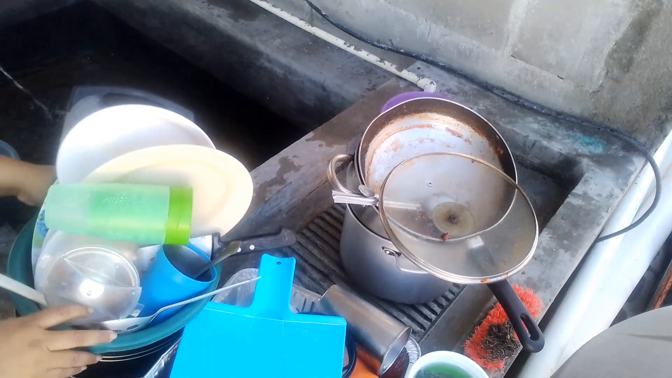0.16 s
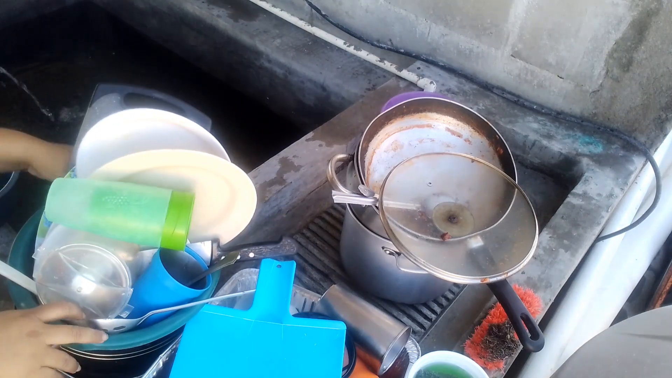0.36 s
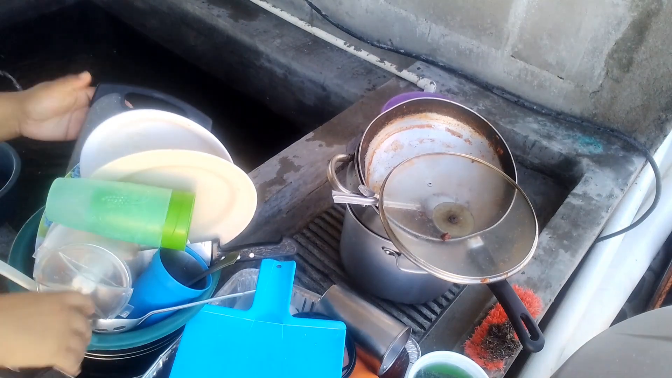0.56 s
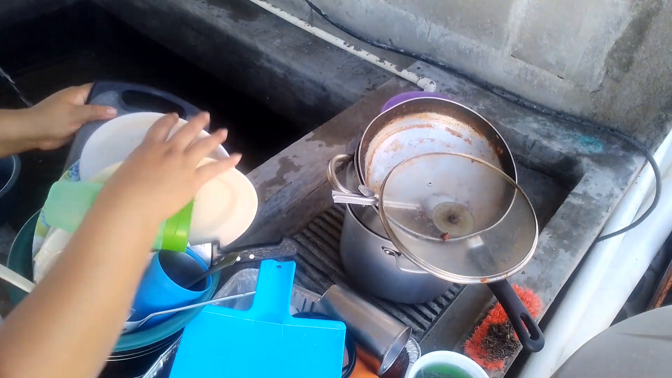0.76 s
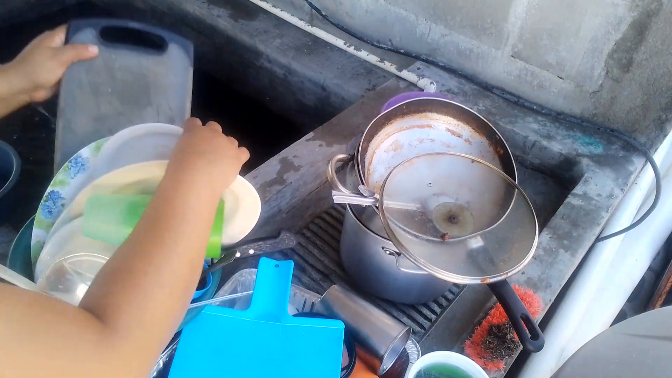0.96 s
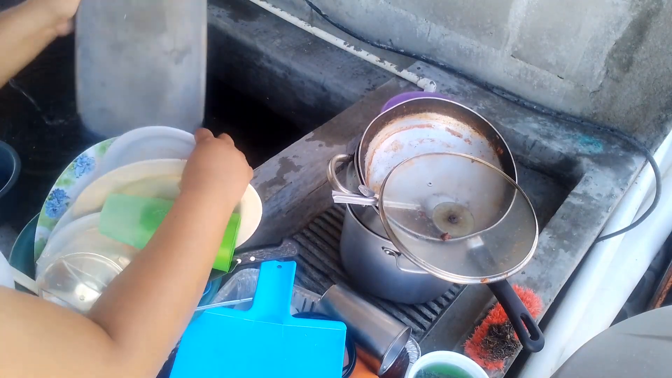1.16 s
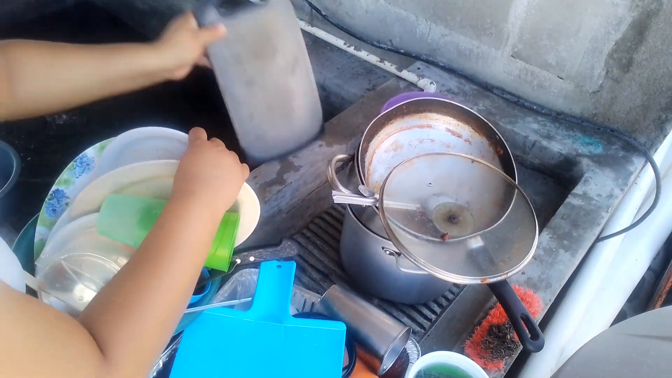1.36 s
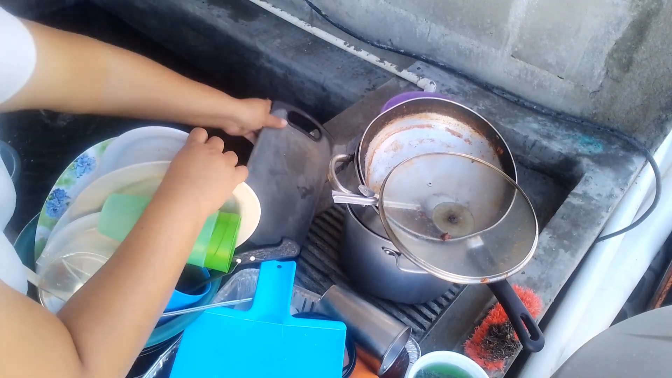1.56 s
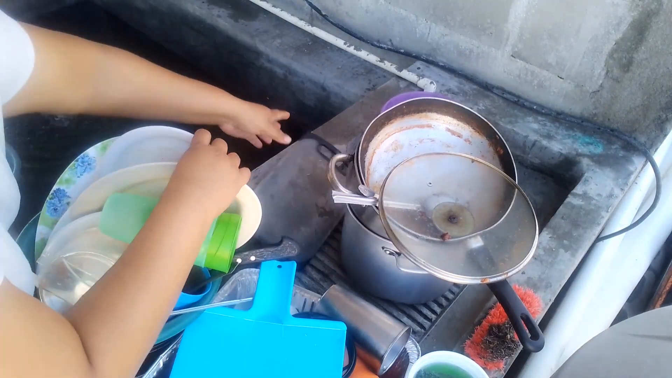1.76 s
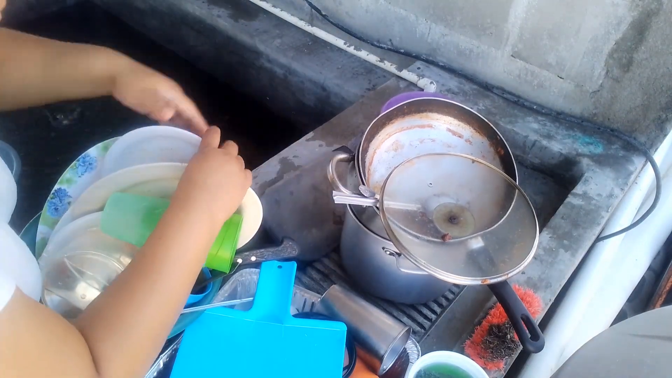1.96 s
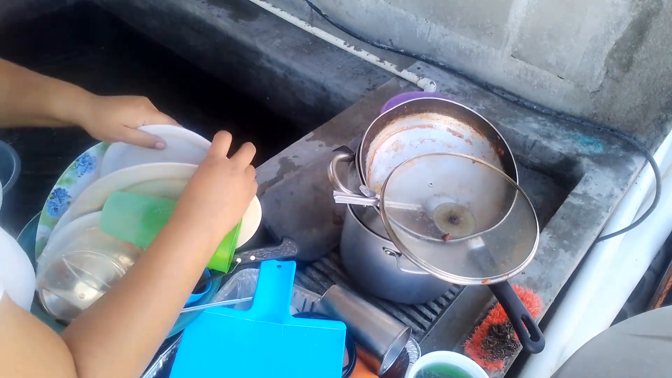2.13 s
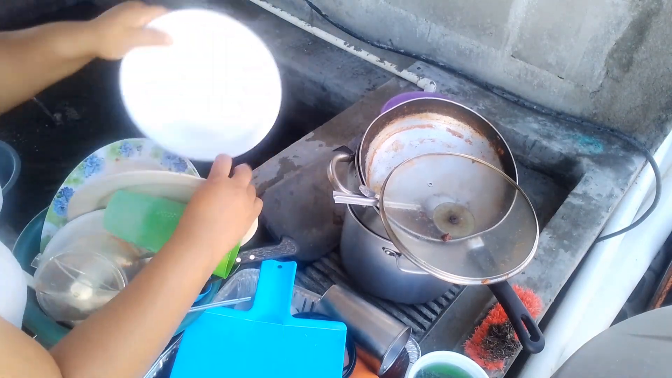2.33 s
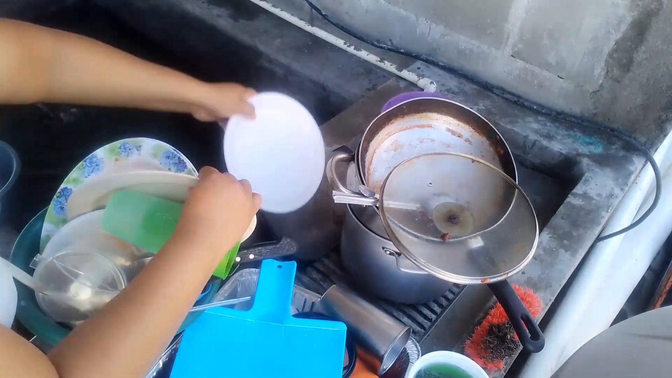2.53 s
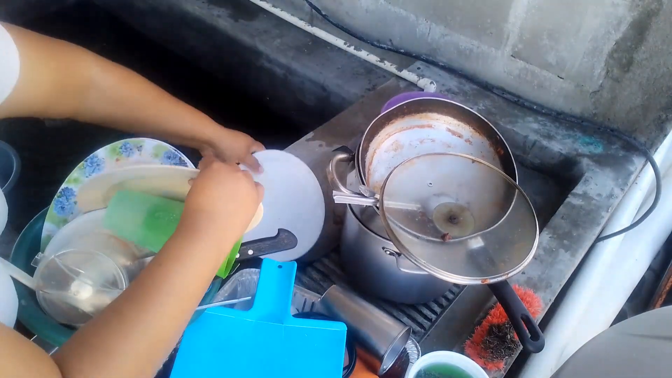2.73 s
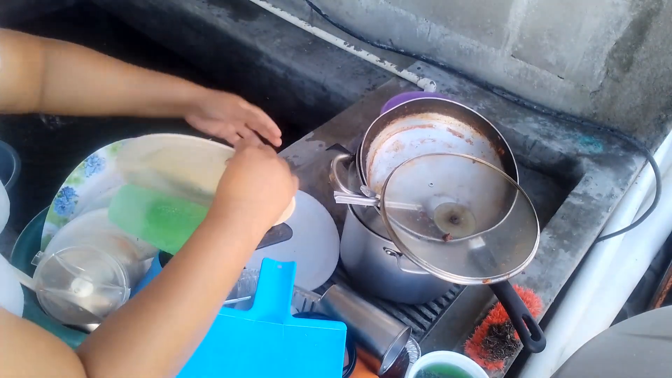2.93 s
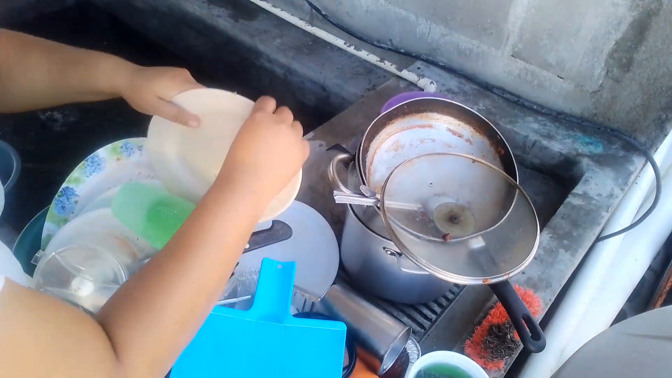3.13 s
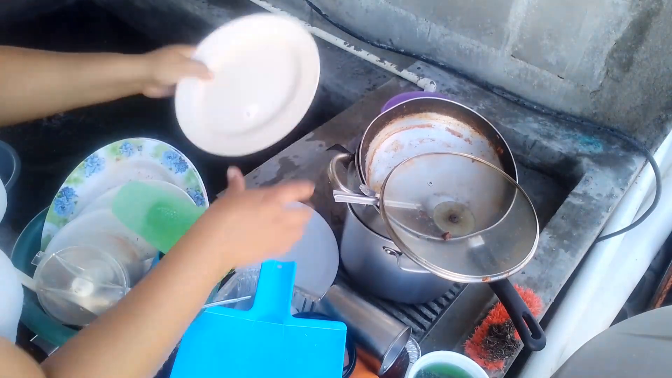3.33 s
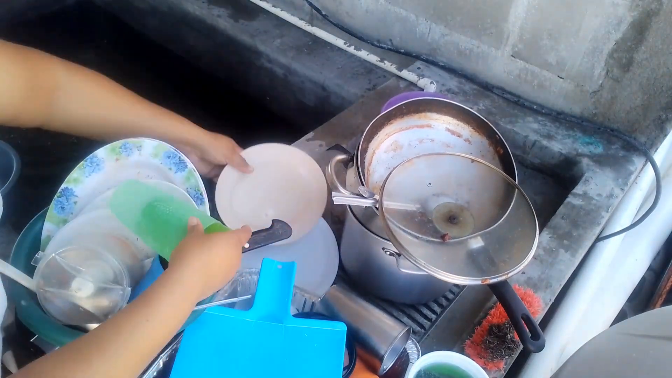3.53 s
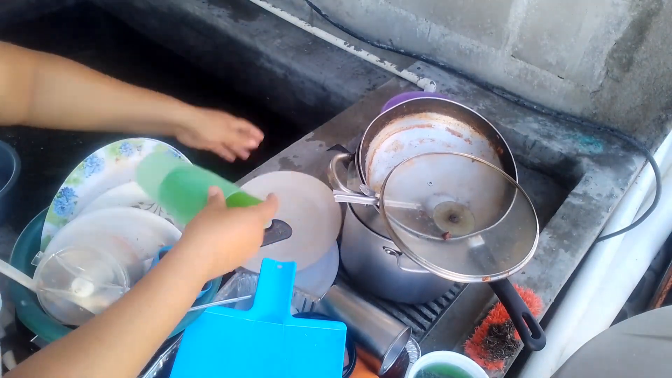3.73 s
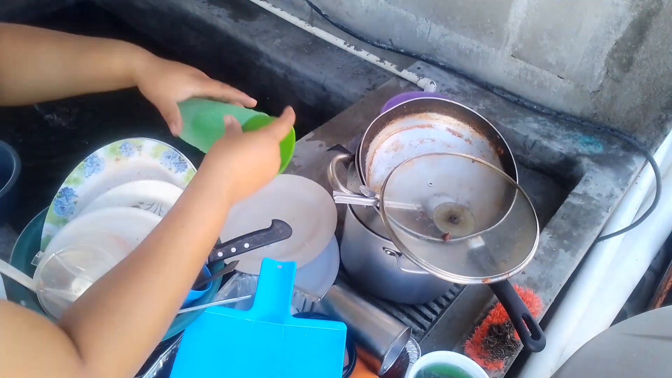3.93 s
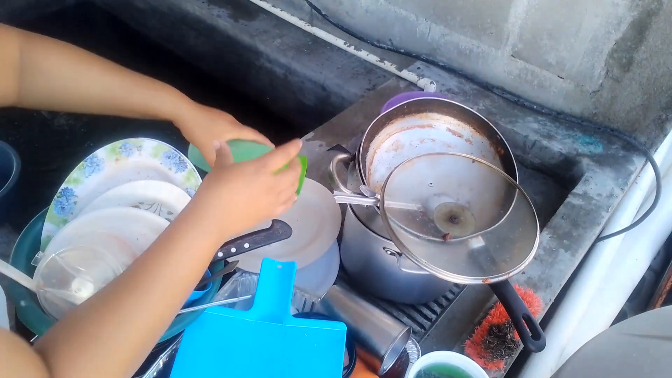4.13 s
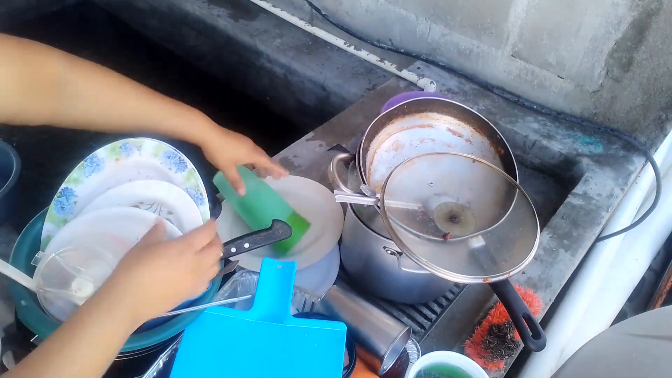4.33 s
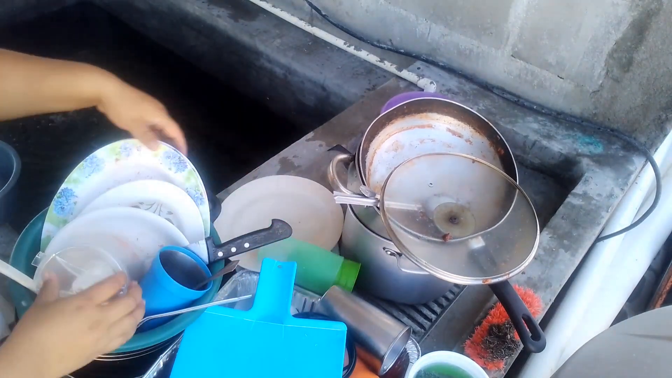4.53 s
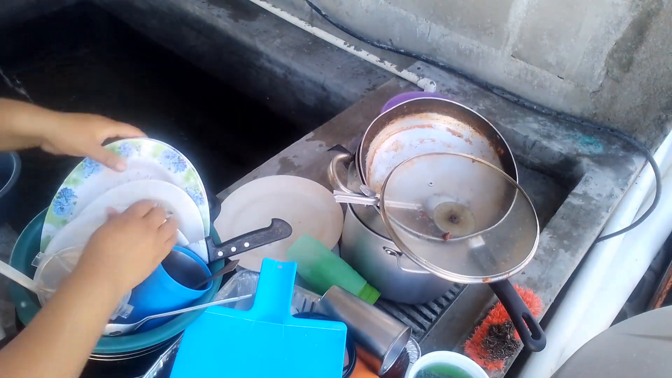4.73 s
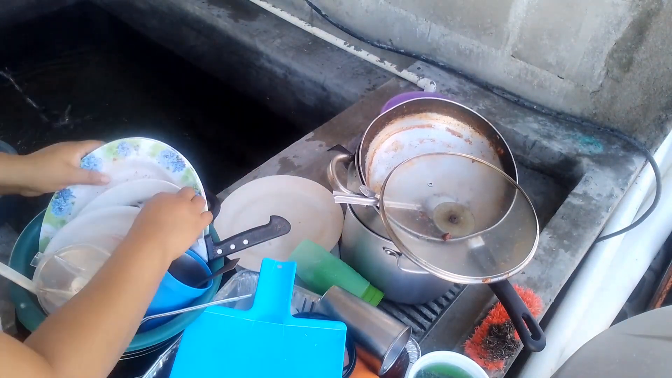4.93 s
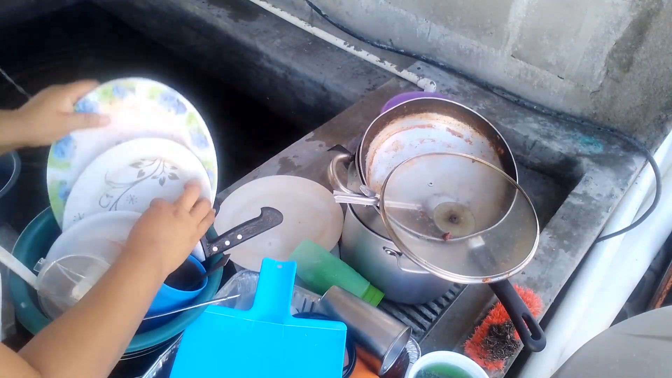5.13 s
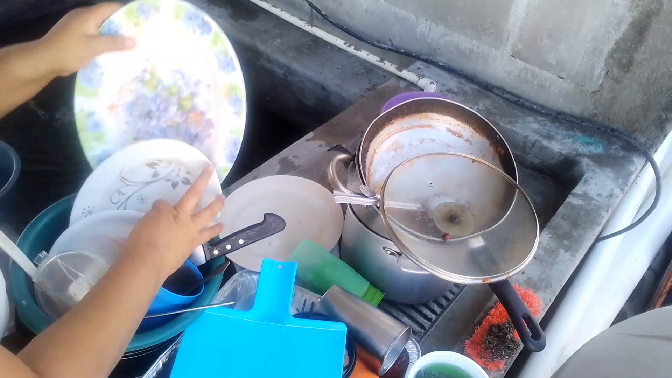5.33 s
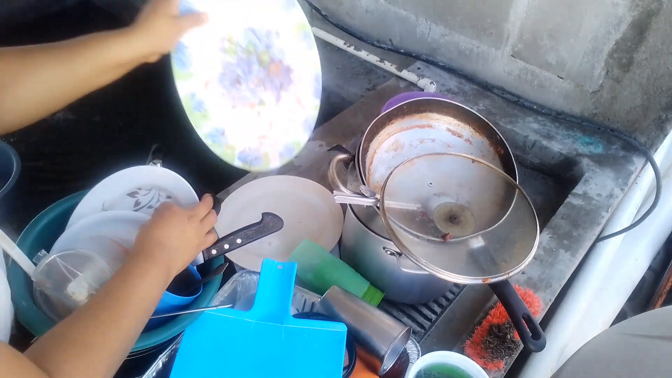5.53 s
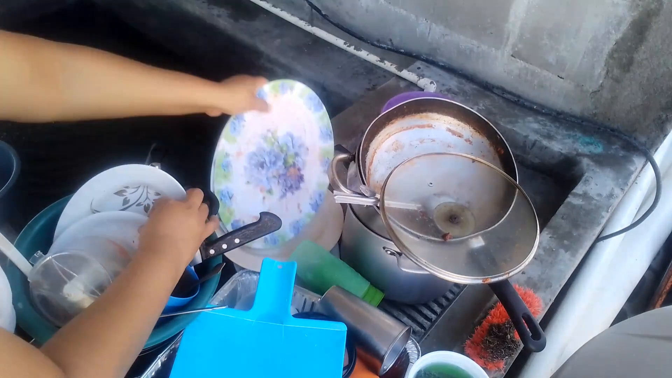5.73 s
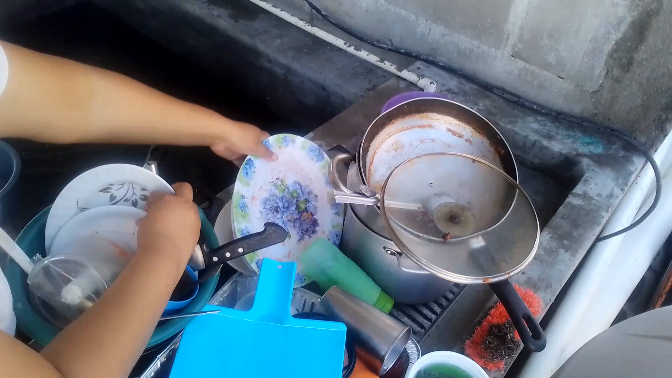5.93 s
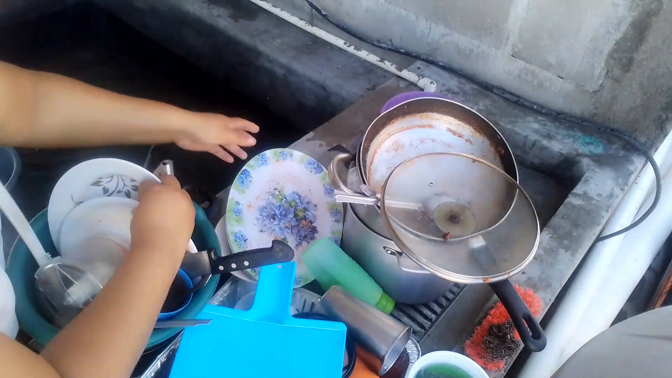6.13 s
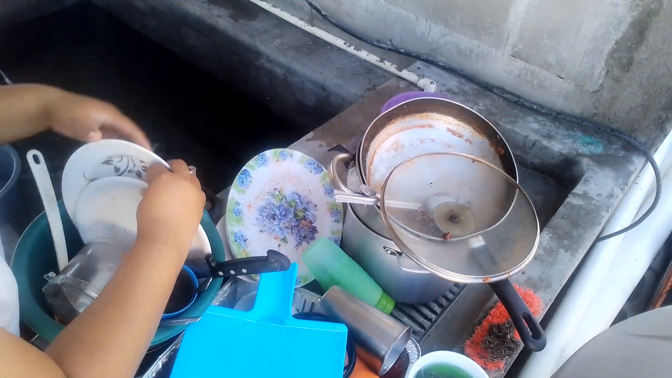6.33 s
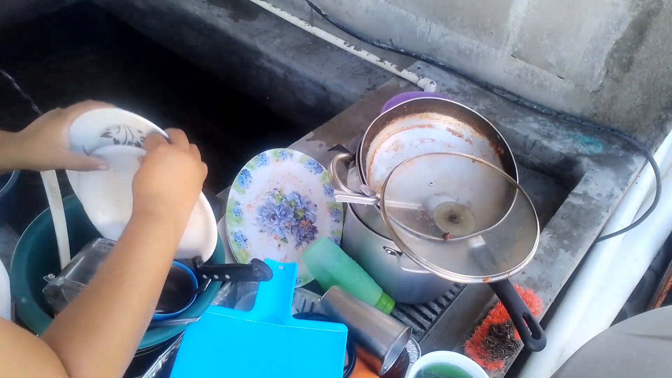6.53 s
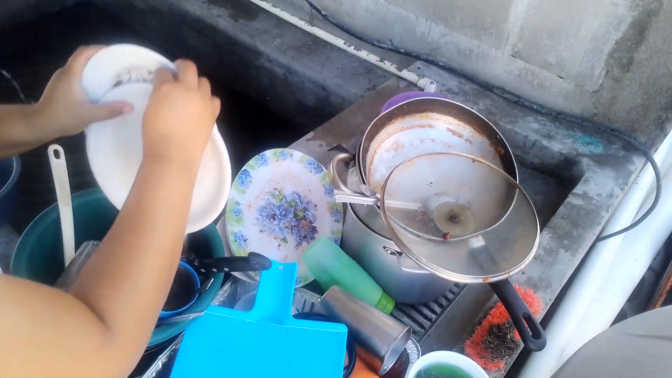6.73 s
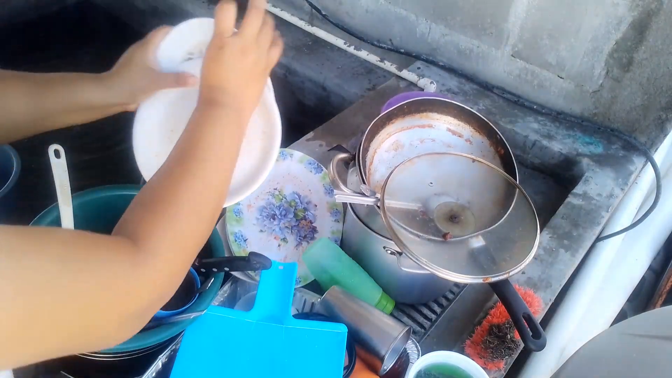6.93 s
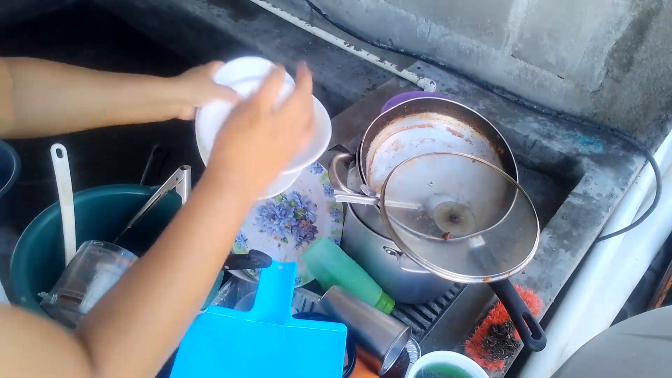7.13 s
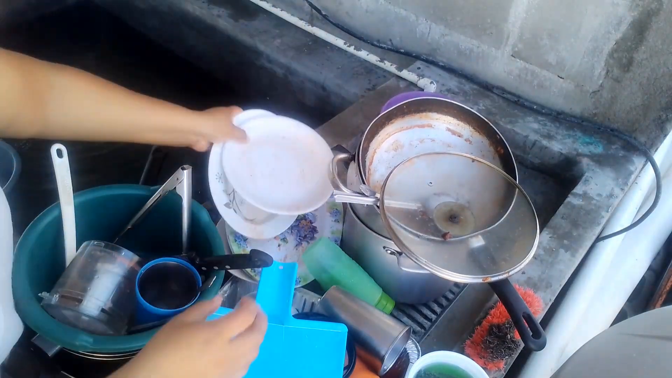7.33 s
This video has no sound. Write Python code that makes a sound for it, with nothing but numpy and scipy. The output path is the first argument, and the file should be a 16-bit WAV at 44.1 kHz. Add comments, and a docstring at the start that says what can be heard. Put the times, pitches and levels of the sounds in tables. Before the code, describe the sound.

Dull, dry plastic knocks begin softly as stacked dishes shift, followed by a low board landing and light plate contacts with rubbing. Mid-pitched cup clatter builds, a hollow tub taps, then hard ceramic clinks and scraping come in quick clusters, loudest here, before sparser bright bowl touches and one final knock. Close handheld phone, concrete trough outdoors, short tail, quiet hiss and hardly any bass.

```python
"""Kitchenware from a plastic basin is unloaded into a concrete outdoor sink: the cutting board is pulled out
and then lands, two light plates, a cup, a plastic tub, a ceramic dish and bowls knock in turn. Each contact is
a tick and a chatter of rim on rim that rings decaying modes; slides are uneven noise and squeaks are gliding
sines. The trough and yard walls answer with short decaying responses. A phone close above, with two resonant
microphone ports, hears it over faint hiss and low rumble."""
import sys
import numpy as np
from scipy import signal
from scipy.fft import rfft, irfft
from scipy.io import wavfile

SR = 44100
rng = np.random.default_rng(int(sys.argv[2]) if len(sys.argv) > 2 else 0)


def store_pcm(level_fs):
    """Save levels as 16-bit WAV."""
    pcm = np.round(np.clip(level_fs, -1, 1) * 32767).astype(np.int16)
    wavfile.write(sys.argv[1], SR, np.atleast_2d(pcm).T)


N = 325061


def board_pulled_out():
    """The cutting board is pulled out of the basin: dull, short modes with little bass and a softened tick."""
    # Contacts. Each row: start in seconds, thud, ring and edge in dB before the object's gain,
    # drag of the rim in seconds, time to the first bounce in seconds (up to 5 ms: no bounce).
    hits = [(0.002, -49.5, -59.5, -66.5, 0.038, 0), (0.252, -54.5, -70, -63, 0.0047, 0),
            (0.346, -73, -74, -56.5, 0.005, 0.0079), (0.438, -63, -74, -77, 0.009, 0.0013),
            (0.69, -70.5, -72, -69.5, 0.02, 0.00042), (0.92, -42.5, -45, -78, 0.0016, 0.0061),
            (1.005, -47.5, -57, -59, 0.0093, 0.037), (1.089, -79, -72, -60.5, 0.0035, 0.0026),
            (1.134, -51, -49.5, -63, 0.0076, 0.003), (1.199, -53, -67, -78, 0.0091, 0),
            (1.232, -50, -48, -68, 0.0073, 0.0021)]
    # Modes of the board while it is pulled out. Each row: frequency in Hz, relative strength in dB, t60 in
    # seconds.
    modes = [(352, -2, 0.13), (450, 6.5, 0.04), (623, 4.5, 0.025), (740, 6.5, 0.022), (980, 11, 0.023),
             (1306, 2, 0.051), (1290, 9, 0.024), (1660, 2, 0.044)]
    return knocks(hits, modes, crack_db=-3, crack_hz=590, crack_t60=0.098, overtone_db=-7,
                  gain_db=-2, lowest_hz=422, soft_hz=2000)


def cutting_board():
    """A board lands: low, strongly damped modes and a soft tick."""
    # Contacts. Each row: start in seconds, thud, ring and edge in dB before the object's gain,
    # drag in seconds, time to the first bounce in seconds (up to 5 ms: no bounce).
    hits = [(1.828, -36.5, -38.5, -55, 0.0038, 0.026), (1.877, -45, -46, -59.5, 0.03, 0),
            (1.924, -41.5, -43.5, -61, 0.0091, 0.00076), (1.937, -41, -48.5, -57.5, 0.0086, 0.017)]
    # Modes of the board. Each row: frequency in Hz, relative strength in dB, t60 in seconds.
    modes = [(368, 0.5, 0.035), (448.5, -0.5, .11), (542, -3.5, 0.098), (722, -3.5, 0.047),
             (818, 3.5, 0.009), (1050, -11, 0.028), (1730, -6.5, 0.014), (2100, -18, 0.033)]
    return knocks(hits, modes, crack_db=5, crack_hz=600, crack_t60=0.066, overtone_db=-5,
                  gain_db=0.5, lowest_hz=200, soft_hz=1920)


def saucer():
    """The first light plate: mostly low, short modes under a longer, quiet crack."""
    # Contacts. Each row: start in seconds, thud, ring and edge in dB before the object's gain,
    # drag in seconds, time to the first bounce in seconds (up to 5 ms: no bounce).
    hits = [(2.277, -64, -45.5, -59, 0.037, 0.002), (2.296, -54.5, -42.5, -47, 0.038, 0.025),
            (2.759, -49.5, -46.5, -59, 0.072, 0.0019), (2.802, -49, -49, -49.5, 0.032, 0.045),
            (2.871, -50, -44, -53, 0.031, 0), (2.892, -38, -42.5, -66, 0.0048, 0.003),
            (2.908, -35, -38.5, -38.5, 0.0057, 0.014), (2.982, -43.5, -45, -51, 0.012, 0.014)]
    # Modes of the saucer. Each row: frequency in Hz, relative strength in dB, t60 in seconds.
    modes = [(235, -3.5, 0.02), (335, -2.5, 0.074), (422, 4, 0.031), (603, -1.5, 0.023), (850, -5.5, 0.05),
             (1024, -12.5, 0.032), (1140, -18, 0.034), (1490, -14.5, 0.02), (1830, -9, 0.0057)]
    return knocks(hits, modes, crack_db=-5.5, crack_hz=900, crack_t60=0.14, overtone_db=-14,
                  gain_db=-1, lowest_hz=30, soft_hz=9450)


def plate():
    """The second light plate: modes spread far upward ring a little longer."""
    # Contacts. Each row: start in seconds, thud, ring and edge in dB before the object's gain,
    # drag in seconds, time to the first bounce in seconds (up to 5 ms: no bounce).
    hits = [(3.0305, -55, -55.5, -46.5, .001, 0.00059), (3.052, -48, -43.5, -87, 0.0041, 0.00028),
            (3.115, -57.5, -63, -86, 0.02, 0.0069), (3.5455, -63, -72.5, -56.5, 0.0039, 0.0034),
            (3.592, -47, -41, -46, 0.0079, 0.026)]
    # Modes of the plate. Each row: frequency in Hz, relative strength in dB, t60 in seconds.
    modes = [(375, 0, .13), (405, -4, .1), (1095, -1, .14), (1220, -1, .09), (1450, -4, .09),
             (1700, -6, .05), (1916, 2, .16), (1990, -4, .06), (2094, -9, .12), (2420, -9, .08),
             (3295, -7, .09), (3680, -10, .06), (4580, -6, .12), (5490, -13, .07), (6072, -9, .1)]
    return knocks(hits, modes, crack_db=-0.5, crack_hz=1200, crack_t60=0.078, overtone_db=-3.5,
                  gain_db=5, lowest_hz=60, soft_hz=8250)


def cup():
    """A cup rattles: a cluster of middle modes with a few longer ones."""
    # Contacts. Each row: start in seconds, thud, ring and edge in dB before the object's gain,
    # drag in seconds, time to the first bounce in seconds (up to 5 ms: no bounce).
    hits = [(3.782, -44.5, -42.5, -41.5, 0.0038, 0), (3.806, -40.5, -40.5, -39.5, 0.0023, 0.0014),
            (3.8408, -40.5, -30.5, -33.5, .0012, .014), (3.877, -48.5, -37, -46, .008, 0),
            (3.9078, -44, -29.5, -35, 0.0072, 0.015), (3.975, -41, -34.5, -42, 0.022, 0.021),
            (4.018, -42.5, -42.5, -55, 0.022, 0.00014), (4.182, -79, -64, -68, .013, 0.0013),
            (4.362, -42.5, -38.5, -47.5, 0.063, 0.00023), (4.388, -41, -35, -42.5, .012, .027),
            (4.472, -45, -43.5, -51.5, .016, 0), (4.497, -38, -32, -39, 0.0053, 0.019),
            (4.569, -41.5, -46, -45.5, 0.0045, 0.0022), (4.585, -35, -39, -44, 0.0078, 0.00054)]
    # Modes of the cup. Each row: frequency in Hz, relative strength in dB, t60 in seconds.
    modes = [(338.4, -0.5, 0.094), (423, 3.5, 0.042), (895, -0.5, 0.019), (1004, -5.5, 0.11),
             (1113, 3, 0.032), (1285, -4, 0.027), (1350, -0.5, 0.02), (1600, -5, 0.033), (1810, -15, 0.035),
             (1910, -7.5, 0.14), (2170, -2, 0.0177), (3314, -4.5, 0.082), (4510, -17, 0.029)]
    return knocks(hits, modes, crack_db=-0.5, crack_hz=1210, crack_t60=0.043, overtone_db=-8,
                  gain_db=-0.5, lowest_hz=39.8, soft_hz=10000)


def tub():
    """A hollow plastic tub: low modes below 2 kHz and only a faint crack."""
    # Contacts. Each row: start in seconds, thud, ring and edge in dB before the object's gain,
    # drag in seconds, time to the first bounce in seconds (up to 5 ms: no bounce).
    hits = [(4.688, -41, -51, -56.5, 0.0022, 0.046), (4.705, -54, -46, -61.5, 0.011, 0.0022),
            (4.8, -52, -49.5, -70, 0.0071, .023)]
    # Modes of the hollow tub. Each row: frequency in Hz, relative strength in dB, t60 in seconds.
    modes = [(270.4, -2, .09), (287.7, -1, 0.039), (343, 2.5, 0.075), (503, -9, 0.042), (886, -5, 0.051),
             (1078, -12.5, 0.065), (1200, -3.5, 0.028), (1580, -13, .05), (1930, -15, 0.018)]
    return knocks(hits, modes, crack_db=-10.0, crack_hz=900, crack_t60=0.041, overtone_db=-13,
                  gain_db=-0.5, lowest_hz=100, soft_hz=8000)


def dish():
    """A ceramic dish: a hard tick, a bright short crack and longer treble modes."""
    # Contacts. Each row: start in seconds, thud, ring and edge in dB before the object's gain,
    # drag in seconds, time to the first bounce in seconds (up to 5 ms: no bounce).
    hits = [(5.0775, -42.5, -40, -33, 0.0068, 0.00071), (5.091, -48, -39.5, -29.5, 0.047, 0),
            (5.1145, -40.5, -36.5, -26.5, 0.017, 0.026), (5.2025, -45, -38.5, -35.5, 0.0034, 0),
            (5.351, -37.5, -36, -31.5, 0.0084, 0.00023), (5.358, -37.5, -36, -28, 0.0084, .024),
            (5.408, -38, -37, -26.5, 0.0047, 0.0026), (5.432, -41.5, -33, -32, 0.02, 0.02),
            (5.492, -39, -32, -26.5, 0.011, 0.00036), (5.498, -32, -33.5, -35.5, 0.0058, 0.025),
            (5.636, -43.5, -41, -48, 0.0016, 0.000088), (5.71, -41, -46, -54.5, .0017, 0.000099),
            (5.77, -48.5, -46, -47.5, 0.0067, 0), (5.823, -49, -42.5, -42, 0.0028, 0.0049),
            (5.914, -42, -41.5, -38, 0.04, 0), (5.951, -41, -36, -35, 0.029, 0.025),
            (6.052, -37.5, -36, -35, 0.033, 0.001), (6.0905, -39, -31.5, -29.5, 0.0039, 0.022)]
    # Modes of the dish. Each row: frequency in Hz, relative strength in dB, t60 in seconds.
    modes = [(390.4, -2, 0.1), (463, 2.5, 0.05), (581, 0, 0.049), (755, -2, 0.079), (985, 1.5, 0.04),
             (1190, 1.5, 0.019), (1300, 1, 0.081), (1380, 3.5, 0.0081), (2194, -2, 0.09), (3316, -5, 0.14),
             (3690, -4, 0.14), (4600, -30, 0.14), (5670, -5, 0.072)]
    return knocks(hits, modes, crack_db=6.5, crack_hz=3540, crack_t60=0.019, overtone_db=-8.5,
                  gain_db=-3, lowest_hz=328, soft_hz=15500)


def bowls():
    """Bowls touch: hard ticks ring many modes far into the treble."""
    # Contacts. Each row: start in seconds, thud, ring and edge in dB before the object's gain,
    # drag in seconds, time to the first bounce in seconds (up to 5 ms: no bounce).
    hits = [(6.213, -62, -52, -48.5, 0.0098, 0), (6.255, -45, -48.5, -46.5, .027, 0.0014),
            (6.296, -45.5, -39.5, -30, 0.019, 0.039), (6.3765, -75, -47.5, -40, 0.0011, 0.0023),
            (6.477, -49, -59, -50, .0034, 0.0012), (6.494, -48.5, -46.5, -38.5, 0.041, 0),
            (6.532, -50.5, -46, -33.5, 0.01, 0.045), (6.65, -52, -57, -52.5, 0.0086, 0.00023),
            (6.8835, -52.5, -74, -53, 0.0025, 0.00074), (7.002, -58.5, -79, -67, 0.0062, 0),
            (7.077, -44, -50, -51, 0.00089, 0.0051), (7.138, -51, -72, -81, 0.0021, 0),
            (7.185, -54.5, -56.5, -67, 0.0023, 0.0042), (7.241, -37, -35, -39, 0.0028, .008)]
    # Modes of the bowls. Each row: frequency in Hz, relative strength in dB, t60 in seconds.
    modes = [(386, -4, 0.091), (520, -2.5, 0.017), (693, -14, 0.047), (1024, 3.5, 0.066), (1328, 4, 0.081),
             (1906, 4, 0.029), (3310, 6, 0.09), (3630, 9, 0.066), (3980, -14, 0.076), (5050, 3, 0.08),
             (6300, -1, 0.079), (7730, 4, 0.079), (8140, 1, .14), (8970, 6, 0.069), (10070, 0, 0.033),
             (12200, 9, 0.073), (11600, 4, 0.069)]
    return knocks(hits, modes, crack_db=3.5, crack_hz=2620, crack_t60=0.019, overtone_db=-3.5,
                  gain_db=-1.5, lowest_hz=244, soft_hz=15300)


def knocks(hits, modes, crack_db, crack_hz, crack_t60, overtone_db, gain_db, lowest_hz, soft_hz,
           thud_hz=750, edge_hz=4000):
    """All contacts of one object: main modes, its own overtones and a crack, weighted as thud, ring and edge."""
    t = seconds(.2)
    level_span = .02 * SR  # samples over which a part's energy gives its level
    overtone_hz = np.linspace(1500, 13800, 48) + rng.uniform(-120, 120, 48)
    overtones = [(hz, 0, .055) for hz in overtone_hz]
    out = np.zeros((2, N + len(t)))
    for start, *levels_db, drag in bounces(hits):
        crack = unit(band(diffuse(len(t)), crack_hz, "high", order=1) * fade(t, crack_t60))
        clink = unit(band(ring(overtones, t, scatter_db=4, detune=.022), crack_hz, "high", order=1))
        bright = crack + undb(overtone_db) * clink
        body = ring(modes, t, scatter_db=2.4, detune=.01) + undb(crack_db) * bright
        # plastic is softer than ceramic
        force = band(contact(t, max(drag, .001)), min(soft_hz, SR / 2 - SR / 20), "low", order=1)
        sound = signal.fftconvolve(force[None], body, axes=1)[:, :len(t)]
        # a flat blow brings out the thud, a hard rim the edge
        thud = band(band(sound, thud_hz, "low"), lowest_hz, "high", order=1)
        middle = band(sound, [thud_hz, edge_hz], "band")
        edge = band(sound, edge_hz, "high")
        weighted = sum(undb(db) * unit(part) for db, part in zip(levels_db, [thud, middle, edge]))
        at = max(int(start * SR), 0)
        out[:, at:at + len(t)] += weighted * np.sqrt(level_span)
    return out[:, :N] * undb(gain_db)


def bounces(hits, count=2, shrink=0.6, bounce_drag_s=0.013):
    """Each contact; if the object is loose, bounces follow, each sooner and weaker and with a short drag."""
    # What each bounce takes away. One row: thud, ring and edge loss in dB.
    loss_db = np.array((6.5, 5.5, 10))
    for start, thud_db, ring_db, edge_db, drag, gap in hits:
        levels_db = np.array([thud_db, ring_db, edge_db])
        yield start, *levels_db, drag
        for k in range(count if gap > .005 else 0):
            start = start + gap * shrink ** k
            yield start, *(levels_db - (k + 1) * loss_db), bounce_drag_s


def contact(t, drag, catches_per_s=2400, clean_drag=0.005):
    """Force of one contact: a tick, then the rim catches and slips; the longer it drags, the weaker the tick."""
    catches = (rng.random(len(t)) < catches_per_s / SR) * rng.standard_normal(len(t))
    force = unit(catches * np.exp(-t / drag))
    force[0] += clean_drag / (drag + .003)
    return force


def ring(modes, t, scatter_db, detune, apart_hz=2200):
    """Decaying modes, left and right; the spot struck and the grip change their strength and pitch."""
    hz, db, t60 = np.transpose(modes)
    size, shift, sign, angle = rng.standard_normal((4, len(hz)))
    phase = np.float32(np.outer(2 * np.pi * hz * (1 + detune * shift), t))
    decay = unit(fade(np.float32(t), np.float32(t60[:, None])))
    gain = np.sign(sign) * undb(db + scatter_db * size)
    # short waves reach the two microphones out of step
    offset = np.array([angle, -angle]) * np.minimum(hz / apart_hz, 1)
    in_step = gain * np.cos(offset) @ (np.sin(phase) * decay)
    out_of_step = gain * np.sin(offset) @ (np.cos(phase) * decay)
    return unit(in_step + out_of_step)


def sliding(body_db=-3, scratch_db=-7, rustle_swell_db=5):
    """Wet surfaces rub: dense uneven slips, dull in the bodies and scratchy at the rims."""
    # One thing slides over another. Each row: start in seconds, length in seconds,
    # rub and scratch in dB before the body and scratch gains.
    strokes = [(0.0, 0.33, -66.5, -75), (0.851, 0.34, -54, -57), (1.26, 0.067, -65, -60),
               (2.003, 0.3, -66.5, -66.5), (2.385, 0.15, -68.5, -56.5), (2.892, 0.26, -52, -51.5),
               (3.315, 0.097, -73, -58), (3.627, 0.089, -54, -54), (3.815, 0.044, -43, -55),
               (4.03, 0.051, -57.5, -54), (4.498, 0.1, -42.5, -43), (4.719, 0.061, -50.5, -56),
               (5.01, 0.11, -50.5, -49), (5.07, 0.041, -44.5, -56), (5.256, 0.2, -52.5, -53),
               (5.73, 0.56, -50.5, -50.5), (6.359, 0.25, -56, -70), (6.872, 0.45, -68, -59.5),
               (7.238, 0.081, -52.5, -46)]
    # The hands never quite rest. One row: rub and scratch in dB before the same gains.
    rustle_db = (-75.5, -66.5)
    # Dull colour of the rubbing bodies. Each row: frequency in Hz, relative level in dB per Hz.
    rub_colour = [(120, -20), (220, -23), (340, 3), (600, 2), (1100, -6.5), (2200, -8), (4000, -20.5),
                  (8000, -55)]
    power = np.outer(undb(rustle_db), undb(rustle_swell_db * wander(count=70))) ** 2
    for start, length, *levels_db in strokes:
        power += np.outer(undb(levels_db), stroke(start, length)) ** 2
    rub, rim = np.sqrt(power)
    unevenness_db = 3.8 * wander(count=2200) + 2.8 * wander(count=300)
    slips = diffuse(N) * undb(unevenness_db)
    body = colour(slips, rub_colour)
    scratch = unit(band(slips, 3260, "high", order=2)) * np.sqrt(N)
    return body * rub * undb(body_db) + scratch * rim * undb(scratch_db)


def stroke(start, length, attack_s=0.019, t60_s=0.42):
    """Speed of one slide: it picks up, holds and dies away."""
    t = np.arange(N) / SR - start
    return np.clip(t / attack_s, 0, 1) * fade(np.maximum(t - length, 0), t60_s)


def squeaks(jitter=.1, flutter_db=4):
    """A wet rim pulled free sticks and slips at a gliding, unsteady rate."""
    # Squeaks. Each row: start in seconds, length in seconds, first and last pitch in Hz before jitter,
    # level in dB before flutter.
    pulls = [(2.236, 0.039, 1160, 1130, -47.5), (2.265, 0.042, 1123, 1067, -49),
             (3.241, 0.035, 1467, 1214, -56), (5.345, 0.1134, 1490, 1300, -46),
             (6.474, 0.015, 501, 780, -36), (7.098, 0.018, 561, 770.6, -51), (7.143, 0.0099, 615, 960, -58)]
    out, unsteady, grip = np.zeros(N), wander(count=4000), wander(count=1800)
    for start, length, first_hz, last_hz, db in pulls:
        at = int(start * SR) + np.arange(int(length * SR))
        hz = np.linspace(first_hz, last_hz, len(at)) * (1 + jitter * unsteady[at])
        phase = 2 * np.pi * np.cumsum(hz) / SR
        envelope = signal.windows.tukey(len(at), .5)
        out[at] += np.sin(phase) * envelope * undb(db + flutter_db * grip[at])
    return out


def sink(x, near_db=-4, near_t60=0.05, yard_db=-10, yard_t60=0.41, trough_db=-28):
    """Direct sound, quick reflections from pots and concrete, the trough's hum and the yard's short tail."""
    # Resonances of the trough and the pots standing in it.
    # Each row: frequency in Hz, relative strength in dB, t60 in seconds.
    trough_modes = [(363.5, -4.5, 0.36), (461, -9.5, 0.15), (735, -3, 0.29), (1019, -9.5, .25),
                    (1080, -7, .4)]
    t = seconds(.6)
    near = unit(band(diffuse(len(t)), 1010, "high", order=1) * fade(t, near_t60))
    yard = unit(diffuse(len(t)) * fade(t, yard_t60) * (1 - np.exp(-t / 0.0054)))
    trough = ring(trough_modes, t, scatter_db=0, detune=0)
    response = undb(near_db) * near + undb(yard_db) * yard + undb(trough_db) * trough
    # direct sound: the right microphone is three samples nearer
    response[[0, 1], [3, 0]] += 1
    return signal.fftconvolve(x, response, axes=1)[:, :N]


def hiss(level_db=-73):
    """Faint outdoor hiss: coloured noise that wavers slightly."""
    # Colour of the hiss. Each row: frequency in Hz, relative level in dB per Hz.
    hiss_colour = [(150, -32.5), (300, -20), (550, 6.5), (900, -12.5), (1800, -2.5), (2800, 4.5),
                   (4200, -3.5), (6500, -5), (11000, -6), (15000, -8.5)]
    waver_db = 1.3 * wander(count=30) + 1.2 * wander(count=220)
    return colour(diffuse(N), hiss_colour) * undb(level_db + waver_db)


def low_rumble(level_db=-92.5):
    """Very quiet bass noise, partly shared by the two channels."""
    # Colour of the rumble. Each row: frequency in Hz, relative level in dB per Hz.
    rumble_colour = [(20, -2.5), (50, -0.5), (115, 3.5), (170, -5), (400, -36)]
    noise = rng.standard_normal((2, N)) + rng.standard_normal(N)
    return colour(noise, rumble_colour) * undb(level_db)


def port(x, hz, width, db, dip_hz, dip_width, depth):
    """A microphone's sound hole: one resonance and one dip."""
    def around(centre, span):
        return signal.lfilter(*signal.iirpeak(centre, centre / span, fs=SR), x)

    x = x - np.clip(depth, 0, 1) * around(dip_hz, dip_width)
    return x + undb(db) * around(hz, width)


def diffuse(count, apart_hz=650):
    """Noise from all sides: alike at both microphones in the bass, unrelated in the treble."""
    mid, side = rng.standard_normal((2, count))
    side = band(side, apart_hz, "high", order=2)
    return np.array([mid + side, mid - side])


def wander(count):
    """Straight segments through count normal random points spread over the scene."""
    return np.interp(np.arange(N), np.linspace(0, N, count), rng.standard_normal(count))


def colour(x, points):
    """Shape the spectrum of x by (Hz, dB) points and give each channel an rms of one."""
    hz, db = np.transpose(points)
    f = np.arange(N // 2 + 1) * SR / N
    gain = undb(np.interp(np.log(f + 1), np.log(hz), db))
    return unit(irfft(rfft(x) * gain, N)) * np.sqrt(N)


def band(x, hz, kind, order=3):
    """Causal Butterworth filter."""
    return signal.sosfilt(signal.butter(order, hz, kind, fs=SR, output="sos"), x)


def fade(t, t60):
    """Free decay, 60 dB in t60 seconds."""
    return np.exp(-np.log(1000) * t / t60)


def seconds(length):
    """Time axis of a short sound."""
    return np.arange(int(length * SR)) / SR


def unit(x):
    """Scale to an energy of one."""
    return x / np.sqrt(np.sum(x ** 2, axis=-1, keepdims=True) + 1e-20)


def undb(db):
    """Decibels to gain."""
    return 10 ** (np.asarray(db) / 20)


def scene():
    """The objects in the order they are handled, with squeaks and slides, heard in the sink over hiss."""
    objects = board_pulled_out() + cutting_board() + saucer() + plate() + cup() + tub() + dish() + bowls()
    return sink(objects + squeaks() + sliding()) + hiss()


def record(dry, low_cut_hz=230, deep_db=-20, right_db=1.33, dull_hz=12600, top_hz=14250):
    """The phone scoops out the upper bass, each microphone port resonates at its own pitch, the top is cut."""
    # Left, then right microphone port. Each row: resonance in Hz, its width in Hz, its added level in dB,
    # dip in Hz, its width in Hz, depth of the dip from 0 to 1.
    port_shapes = [(7520, 820, 13.5, 13200, 4800, 0.64), (10660, 890, 12, 4500, 5700, 0.14)]
    deep = band(dry, [35, 110], "band", order=3)
    thin = band(dry, low_cut_hz, "high", order=8) + undb(deep_db) * deep
    ported = [port(x, *shape) for x, shape in zip(thin, port_shapes)]
    balance = undb([[-right_db / 2], [right_db / 2]])  # right louder than left by right_db
    heard = band(balance * ported, dull_hz, "low")
    top_cut = signal.ellip(10, .2, 70, top_hz, fs=SR, output="sos")
    return signal.sosfilt(top_cut, heard + low_rumble())


dry = scene()
out = record(dry)
store_pcm(out)
```